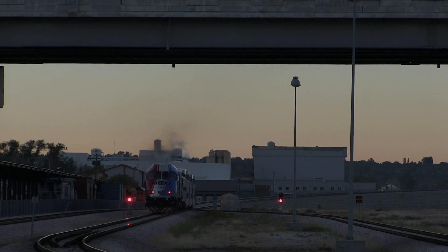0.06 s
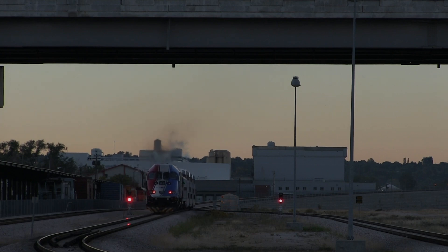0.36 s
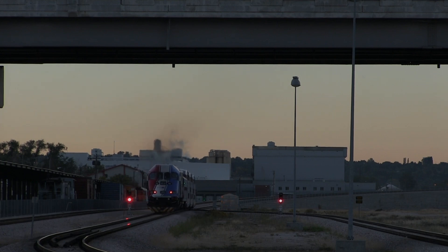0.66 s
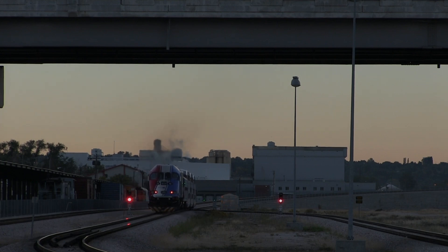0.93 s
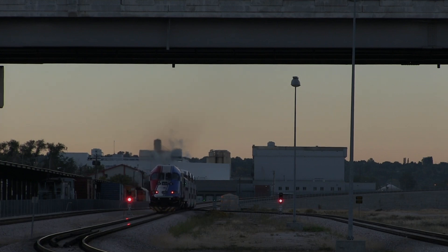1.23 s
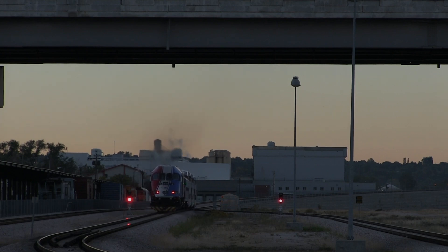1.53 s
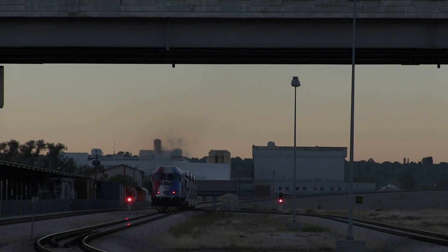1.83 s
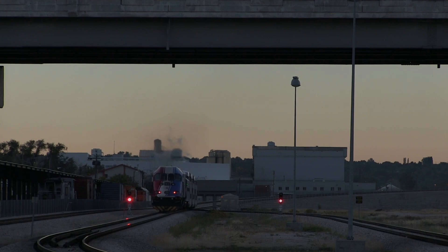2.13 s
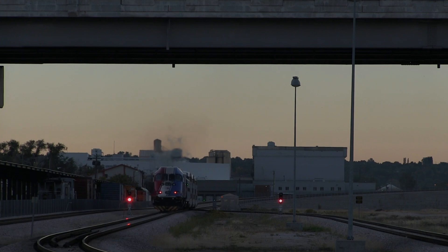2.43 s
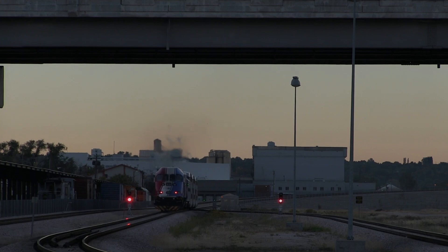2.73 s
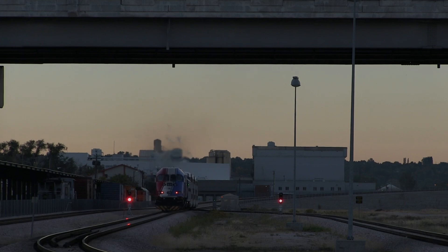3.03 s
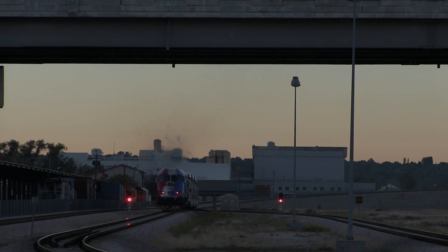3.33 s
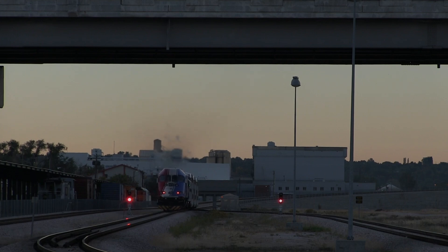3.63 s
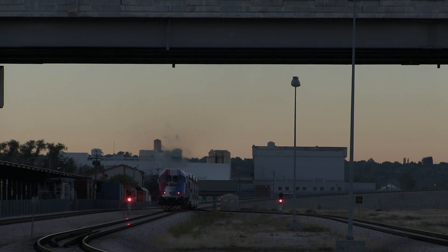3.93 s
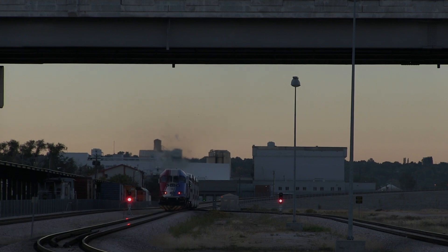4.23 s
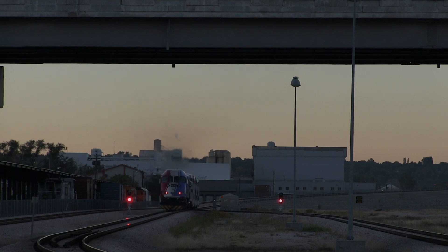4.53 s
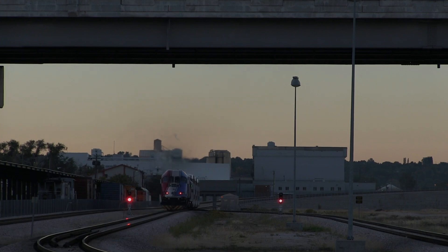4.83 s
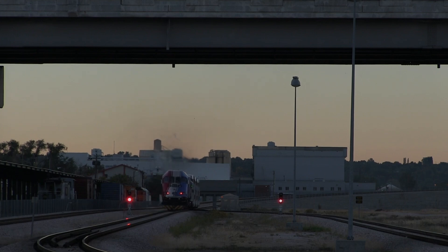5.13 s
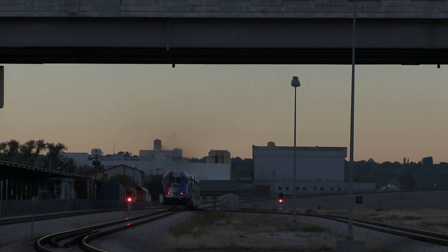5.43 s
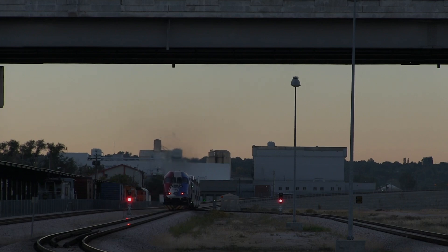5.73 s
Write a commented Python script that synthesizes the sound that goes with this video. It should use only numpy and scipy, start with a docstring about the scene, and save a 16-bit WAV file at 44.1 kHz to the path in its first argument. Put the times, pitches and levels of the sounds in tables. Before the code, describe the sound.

A diesel commuter train pulls away in an open rail yard, heard from some distance for about six seconds. From the start the engine makes a deep, unevenly throbbing drone over a broad, steady roar of exhaust and fans. A soft hiss of air escapes at about 0.3 seconds. The deep note is strongest in the first second and fades after 2.5 seconds. A few harder low puffs come near 2.2, 3, 4.2 and 5.1 seconds. From about 3.5 seconds a higher engine note emerges, climbing and growing toward the end, with the deep note swelling briefly near 5.8 seconds. Thin blower and gear whines come and go, slowly rising in pitch. The running gear clinks faintly throughout, and a wheel gives brief, faint, high squeals on the curve in the first second and near 2.4, 3.7 and 4.7 seconds.

```python
"""An open rail yard, where a diesel commuter train pulls away under power some way off.
The engine's firing makes a deep, throbbing drone; as that note fades, a higher one climbs out of it.
Swirling exhaust and fans make a broad roar, and the spinning blower and gears add thin, rising whines.
The running gear clinks, a rubbing wheel sings on the curve, and a little air hisses off near the start."""
import sys
import numpy as np
from scipy import signal
from scipy.fft import rfft, irfft, next_fast_len
from scipy.io import wavfile

SR = 44100
rng = np.random.default_rng(int(sys.argv[2]) if len(sys.argv) > 2 else 0)


def dump(signal):
    """Clip the signal to [-1, 1] and save it as 16-bit WAV at the path in sys.argv[1]."""
    limited = np.clip(np.atleast_2d(signal).T, -1, 1)
    pcm = np.round(limited * 32767).astype(np.int16)
    wavfile.write(sys.argv[1], SR, pcm)


N = 263718
TIME = np.arange(N) / SR

# The tone colours of five noises. Each row: frequency in Hz, relative strength in dB.
AIR_COLOUR = [(100, -0.5), (5000, -2), (8000, 1), (12000, -4.5), (15700, -10)]
RUMBLE_COLOUR = [(12, -24.5), (25, -5.5), (40, 4), (52, 3.5), (68, 16), (90, -7), (110, 12), (150, -14.5),
                 (300, -62)]
BODY_COLOUR = [(70, -40.5), (105, -1), (122, 0), (140, -2), (156, -3.5), (205, -3.8), (280, -3.5),
               (370, -9.5), (550, -22), (1200, -61.5)]
FAN_COLOUR = [(150, -22), (330, -3), (480, -1), (600, -2), (780, -1), (1030, -4.5), (1300, -8.5),
              (1700, -11), (2500, -30), (5000, -65.5)]
RUSH_COLOUR = [(600, -24), (1400, -4.5), (2000, 2), (2600, 0), (3300, -4), (4000, -14), (5000, -24),
               (6300, -35), (9000, -45.5)]
# Hisses from air leaks and wheels.
# Each row: peak time and half-length in seconds, level in dB, centre in Hz, width in octaves.
HISSES = [(0.077, .2, -58, 5200, 0.5), (.35, 0.085, -41.5, 2870, 0.31), (0.346, .028, -58, 7000, .55),
          (.37, 0.046, -51.5, 4850, .13), (.3, 0.41, -51, 3780, .06), (0.8, 0.11, -73, 6900, .1),
          (1.7, 0.1, -43, 3070, .2), (2.32, 0.14, -42, 2600, 0.08), (2.4, 0.18, -68, 5700, .2),
          (2.4, .15, -74, 7650, .08), (3.78, 0.19, -48, 3100, 0.15), (4.7, 0.22, -47, 3140, .12)]
# The pitches a wheel rings at. Each row: pitch in Hz, relative strength in dB.
WHEEL_RINGS = [(2606, -3.5), (2767, 2.5), (2896, -2), (3080, -4.5), (3200, -5), (3420, -6), (3801, -9)]
# Rubs of the wheel's rim.
# Each row: peak time and half-length in seconds, strength in dB, favoured pitch in Hz, width in octaves.
WHEEL_RUBS = [(0.167, 0.066, -45, 2770, 0.055), (0.352, 0.068, -45, 2900, 0.35),
              (.65, .12, -49, 2860, 0.044), (2.45, .06, -43, 3200, .03), (3.68, 0.061, -46, 2900, .04),
              (4.74, .06, -41, 3080, .04)]
# The blower shaft's speed. Each row: time in seconds, turns per second.
SHAFT_SPEED = [(0, 42.4), (1.3, 44.4), (2, 45.1), (2.55, 45.7), (3.1, 45.98), (4, 46.2), (4.8, 46.58),
               (5.98, 47.3)]
# Blower whines. Each row: peak time and half-length in seconds, level in dB, multiple of shaft speed.
BLOWER_WHINES = [(0, 0.085, -31, 10), (.3, 0.33, -44.5, 33), (1.972, 0.24, -36.5, 22),
                 (2.52, 0.11, -36.5, 22), (2.3, 0.7, -33.5, 10), (2.15, .15, -47, 55), (2.5, .03, -41, 55),
                 (2.76, .05, -44, 55), (3.121, .09, -41.5, 55), (3.6, 0.29, -48.5, 55),
                 (4.6, 0.32, -34.5, 10), (4.83, 0.044, -38.5, 55), (5.05, .04, -43, 55),
                 (5.2, 0.66, -38, 6.7), (5.4, .75, -39, 22), (5.6, 0.56, -50, 55)]
# Swells of the gear whine. Each row: peak time and half-length in seconds, level in dB.
GEAR_WHINES = [(.2, 0.53, -35), (3.657, 0.18, -38), (5.45, 0.8, -35)]
# Low noise of swirling exhaust. Each row: time in seconds, rumble in dB, body (just above it) in dB.
EXHAUST_NOISE = [(0, -28, -26), (.6, -30.5, -24.5), (1.35, -28.5, -27), (1.9, -37, -27), (2.8, -29.5, -26),
                 (3.4, -28.5, -27.5), (4.1, -32, -27), (4.6, -30.5, -27.5), (5.6, -36, -28),
                 (5.98, -29, -25.5)]
# The train's broad noise. Each row: time in seconds, fan roar in dB, engine rush in dB.
FAN_AND_RUSH = [(0, -26, -34), (.35, -25, -33.5), (.7, -25.5, -35), (1.35, -25.5, -36), (1.85, -25.5, -35),
                (2.45, -27, -34.5), (2.8, -25.5, -35), (3.35, -25, -35.5), (3.8, -25, -34),
                (4.25, -25.5, -35.5), (4.8, -26, -34), (5.3, -25.5, -36), (5.98, -26, -34.5)]
# The engine housing's hollow ring, strongest at the start. Each row: time in seconds, level in dB.
HOUSING_LEVEL = [(0, -29.5), (.7, -32.5), (1.3, -36), (2.3, -35), (3, -45.5), (5.98, -48)]
# The ring of the exhaust stack. Each row: time in seconds, level in dB.
STACK_LEVEL = [(0, -31.5), (.7, -30.5), (1.5, -49.5), (2.8, -30), (3.15, -42), (3.7, -28.5), (4.1, -29.5),
               (4.5, -38.5), (5.05, -23), (5.4, -41), (5.98, -24.5)]
# Single harder puffs of exhaust. Each row: peak time in seconds, level in dB, pitch in Hz.
HARD_CHUGS = [(2.215, -17, 105.5), (2.878, -23, 93.2), (3.06, -17.5, 91), (4.19, -18.5, 98.8),
              (5.12, -22, 100.1)]
# Brief swells and sags of the exhaust. Each row: time in seconds, change in dB.
EXHAUST_THROBS = [(.055, -4.5), (.155, 1.5), (.255, -2.5), (.3, 3), (.36, -3.5), (.47, 2), (.54, -1),
                  (.61, 3.5), (.76, 2), (.79, 1), (.828, 3), (.87, -2), (.925, -1.5), (.96, 5.5),
                  (1.003, -4), (1.037, 4), (1.07, -1.5), (1.11, 3), (1.24, -1), (1.295, 3), (1.35, 1.5),
                  (1.39, -7), (1.461, 3), (1.51, -4), (1.575, 3), (1.64, -4), (1.68, 3), (1.76, -8),
                  (1.862, 2), (1.93, -4), (2.1, -2), (2.255, -4), (2.295, -1.5), (2.39, -2), (2.43, 0.5),
                  (2.99, -3), (3.21, -11), (3.58, -5), (4.3, 5.5), (4.41, -3), (4.58, -2), (4.68, -1.5),
                  (4.955, -4), (5.22, -3)]
# The firing rate, which sags under load. Each row: time in seconds, firings per second.
FIRING_RATE = [(0, 78), (1.1, 85), (2, 80.2), (2.45, 77.6), (4.5, 72.5), (5.98, 77)]
# The deep exhaust note. Each row: time in seconds, level in dB before throbbing.
DEEP_NOTE = [(0, -13.5), (.3, -13.3), (.58, -13.5), (.72, -20.5), (1, -16), (1.25, -22), (1.85, -19),
             (2.18, -29.5), (2.32, -17.5), (2.44, -20), (2.55, -27.5), (3.1, -25.5), (4.2, -26),
             (4.5, -33.5), (5.55, -29), (5.77, -17), (5.98, -35)]
# Extra tones from unequal cylinders. Each row: multiple of the engine's cycle rate, base level in dB.
UNEVEN_TONES = [(7, -38.5), (9, -33), (10, -32.5), (11, -44), (13, -36), (14, -28), (16, -34), (18, -34.5),
                (20, -36.5), (21, -35), (24, -37.5), (30, -36.5), (36, -44), (41, -47.5)]
# How those tones rise and fall together. Each row: time in seconds, change in dB.
UNEVEN_CHANGE = [(0, -3), (1.2, -1.5), (2.1, -6), (2.6, -1.5), (4.2, -3), (5.2, -3.5), (5.98, 0.5)]
# The climbing exhaust note. Each row: time in seconds, level in dB before throbbing, pitch in Hz.
CLIMBING_NOTE = [(3.45, -32, 102.7), (3.72, -24, 103.4), (4.2, -41, 104.2), (4.55, -32, 104.8),
                 (4.84, -26, 109.7), (5.17, -29, 107.2), (5.38, -24.5, 109.9), (5.6, -20.5, 113.5),
                 (5.98, -20, 120.5)]


def gain_of(db):
    """Turn decibels into a number to multiply by."""
    return 10 ** (np.asarray(db) / 20)


def evened(x):
    """Scale a signal to an average power of 1."""
    return x / np.sqrt(np.mean(abs(x) ** 2) + 1e-20)


def curves(rows):
    """Join a timed table's points with lines, giving one curve per value column."""
    times, *columns = np.transpose(rows)
    return [np.interp(TIME, times, column) for column in columns]


def swell(when, half_s):
    """A bell-shaped rise and fall around a moment."""
    return np.exp(-.5 * ((TIME - when) / half_s) ** 2)


def shaped(gain):
    """Noise of power 1 whose frequencies are weighted by gain(Hz)."""
    size = next_fast_len(N)
    spectrum = rfft(rng.standard_normal(size)) * gain(np.fft.rfftfreq(size, 1 / SR))
    return evened(irfft(spectrum, size)[:N])


def coloured(points):
    """Noise that follows a tone colour table."""
    hz, db = np.transpose(points)
    return shaped(lambda f: gain_of(np.interp(np.log(f + 1), np.log(hz), db)))


def band(hz, octaves):
    """Noise gathered around one pitch."""
    return shaped(lambda f: np.exp(-.5 * (np.log2((f + 1) / hz) / octaves) ** 2))


def drift(rate_hz):
    """A random wobble, no faster than about the given rate."""
    return shaped(lambda f: np.exp(-(f / rate_hz) ** 2))


def angle(hz):
    """Add up a pitch curve into a phase: how far the wave has turned."""
    return 2 * np.pi * np.cumsum(hz) / SR


def tone(phase, db):
    """A pure tone at an average level in dB."""
    return np.sqrt(2) * gain_of(db) * np.sin(phase)


def scattered(phase, rate_hz, share):
    """A tone heard through moving air: a share of it fades at random, the rest is steady."""
    times = np.arange(0, TIME[-1] + .02, .02)
    shifts_hz = rng.standard_normal(24) * rate_hz
    turns = np.outer(times, shifts_hz) + rng.random(len(shifts_hz))
    paths = evened(np.exp(2j * np.pi * turns).sum(1))
    fading = np.interp(TIME, times, np.sqrt(1 - share) + np.sqrt(share) * paths)
    return np.sqrt(2) * abs(fading) * np.sin(phase + np.angle(fading) + 2 * np.pi * rng.random())


def open_air():
    """The faint, steady hiss of the outdoors."""
    return gain_of(-72) * coloured(AIR_COLOUR)


def hisses():
    """Leaking air and wheels on the curve make short swells of hiss."""
    return sum(gain_of(db) * swell(when, half_s) * band(hz, octaves)
               for when, half_s, db, hz, octaves in HISSES)


def clinks(per_second=16, low_hz=1500, high_hz=3500, ring_s=.28):
    """Couplings and running gear ring briefly at random, each clink's start softened by distance."""
    out, t = np.zeros(N), np.arange(SR // 2) / SR
    ring = (1 - np.exp(-t / .006)) * gain_of(-60 * t / ring_s)
    for when, pitch, force in rng.random((round(per_second * TIME[-1]), 3)):
        start = int(when * N)
        octaves = pitch * np.log2(high_hz / low_hz)
        db = -45 - 5 * octaves + 8 * force  # higher clinks are quieter
        clink = ring * tone(2 * np.pi * low_hz * 2 ** octaves * t, db)
        out[start:start + len(t)] += clink[:N - start]
    return out


def wheel_song():
    """The wheel's rim rubs the rail; each rub wakes the ringing tones nearest its own pitch."""
    out = np.zeros(N)
    for ring_hz, ring_db in WHEEL_RINGS:
        rubbing = np.zeros(N)
        for when, half_s, db, hz, octaves in WHEEL_RUBS:
            nearness = np.exp(-.5 * (np.log2(ring_hz / hz) / octaves) ** 2)
            rubbing += gain_of(db) * swell(when, half_s) * nearness
        phase = angle(ring_hz * (1 + .0044 * drift(12)))
        out += gain_of(ring_db) * rubbing * scattered(phase, rate_hz=24, share=.56)
    return out


def blower_whine():
    """The blower sings at multiples of its shaft speed; higher tones waver faster."""
    speed, = curves(SHAFT_SPEED)
    shaft = angle(speed * (1 + .002 * drift(8)))
    out = np.zeros(N)
    for when, half_s, db, multiple in BLOWER_WHINES:
        whine = scattered(multiple * shaft, rate_hz=3 + .12 * multiple, share=.27)
        out += gain_of(db) * swell(when, half_s) * whine
    return out


def gear_whine(start_hz=380, rise_hz_per_s=9.1):
    """The drive gears sing higher as the train gains speed."""
    level = sum(gain_of(db) * swell(when, half_s) for when, half_s, db in GEAR_WHINES)
    return level * scattered(angle(start_hz + rise_hz_per_s * TIME), rate_hz=2.3, share=.11)


def roar():
    """Noise of swirling exhaust, fans and hollow housing; fans and rush pulse faintly with the firing."""
    rumble_db, body_db = curves(EXHAUST_NOISE)
    fan_db, rush_db = curves(FAN_AND_RUSH)
    housing_db, = curves(HOUSING_LEVEL)
    pulse = np.cos(firing_phase())
    rumble = throb() * gain_of(rumble_db + .7 * drift(11)) * coloured(RUMBLE_COLOUR)
    body = throb() ** .25 * gain_of(body_db + .7 * drift(8.9)) * coloured(BODY_COLOUR)
    fans = gain_of(fan_db - .2 + .41 * drift(9.1) + .34 * pulse) * coloured(FAN_COLOUR)
    rush = gain_of(rush_db - 1.13 + .55 * drift(26) + .66 * pulse) * coloured(RUSH_COLOUR)
    housing = gain_of(housing_db + 1.5 * drift(13)) * band(hz=948, octaves=.34)
    return rumble + body + fans + rush + housing


def stack_ring(hz=137):
    """Flowing gas keeps the exhaust stack humming at one pitch."""
    db, = curves(STACK_LEVEL)
    return gain_of(db + 1) * scattered(angle(np.full(N, hz)), rate_hz=3, share=.34)


def chugs():
    """Each chug is a low puff of exhaust, only a few waves long."""
    return sum(swell(when, half_s=.012) * tone(2 * np.pi * (hz * TIME + rng.random()), db)
               for when, db, hz in HARD_CHUGS)


def throb():
    """A volume curve for the exhaust's uneven swells and sags."""
    return gain_of(sum(db * swell(when, half_s=.019) for when, db in EXHAUST_THROBS))


def firing_phase():
    """The engine's beat: one full turn for each firing."""
    return angle(curves(FIRING_RATE)[0])


def exhaust_drone(cylinders=12):
    """The firing makes a deep note, and unequal cylinders add weaker tones around it."""
    deep_db, = curves(DEEP_NOTE)
    firing = firing_phase() + .22 * drift(9)
    deep = tone(firing, deep_db - .3) + tone(2 * firing, deep_db - 23.5)
    cycle = firing_phase() / cylinders
    change_db, = curves(UNEVEN_CHANGE)
    uneven = sum(gain_of(db) * scattered(multiple * cycle, rate_hz=1.1, share=.81)
                 for multiple, db in UNEVEN_TONES)
    return deep + gain_of(change_db) * uneven


def exhaust_climb():
    """A higher exhaust note rises late on, with a softer tone an octave above it."""
    db, hz = curves(CLIMBING_NOTE)
    phase = angle(hz)
    return gain_of(db) * scattered(phase, rate_hz=4, share=.04) + tone(2 * phase, db - 14.5)


def scene():
    """The whole train over the open air, in one channel."""
    exhaust = throb() * (exhaust_drone() + exhaust_climb() + stack_ring()) + chugs()
    machinery = blower_whine() + gear_whine() + wheel_song() + clinks()
    return (exhaust + machinery + roar() + hisses() + open_air())[None]


def record(dry):
    """Cut away the very highest treble."""
    top_hz = 15750
    low_pass = signal.firwin(511, top_hz, window=("kaiser", 9), fs=SR)
    return signal.oaconvolve(dry, low_pass[None], "same")


dry = scene()
out = record(dry)
dump(out)
```